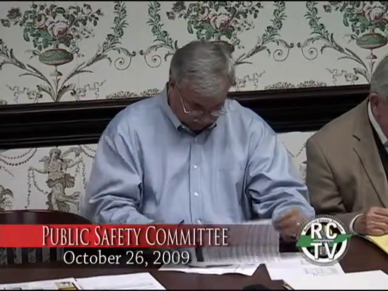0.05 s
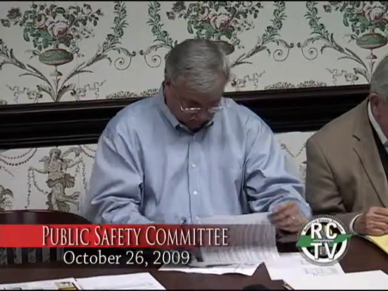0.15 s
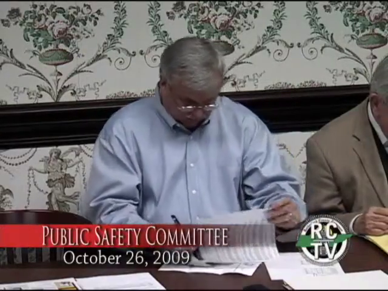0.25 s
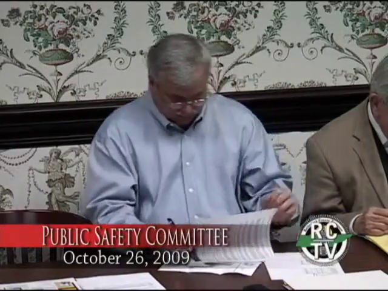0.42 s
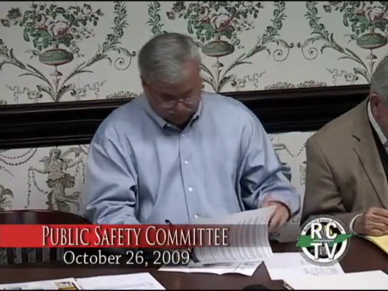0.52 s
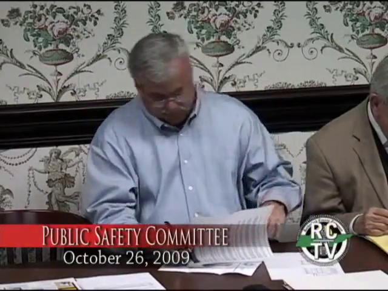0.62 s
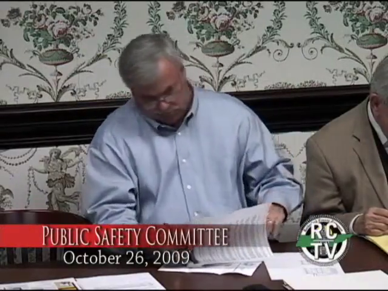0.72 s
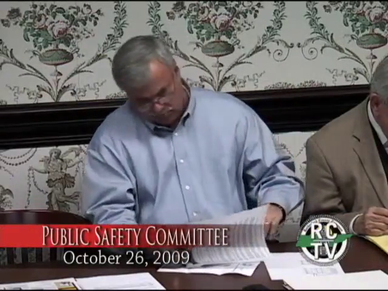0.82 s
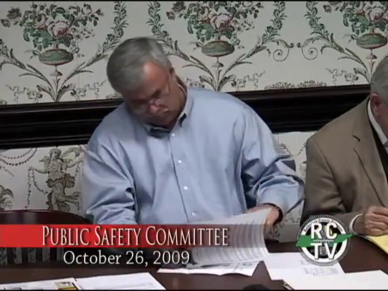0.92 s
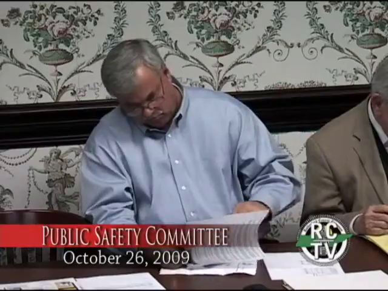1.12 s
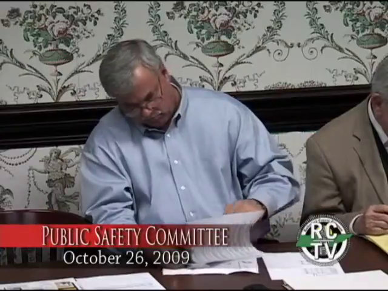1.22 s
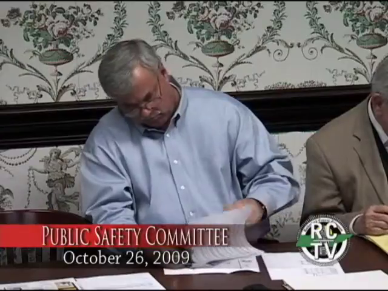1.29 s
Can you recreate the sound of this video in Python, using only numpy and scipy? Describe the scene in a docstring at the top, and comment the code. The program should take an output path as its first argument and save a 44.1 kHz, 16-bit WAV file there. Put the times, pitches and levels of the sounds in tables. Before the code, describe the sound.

Sheets of paper slide softly, then one page snaps taut with a sharp crack and short crinkling flap; a quiet pause follows, then fuller rustling. Small indoor room, fairly close microphone, low ventilation and electrical buzz.

```python
"""Paper on a meeting-room table

Sheets are leafed through: friction noise and fibre ticks slide, resonant bursts crinkle,
and one sheet snaps taut and flaps; low damped sines are pushes of hand and air on the table.
Shaped noise makes the ventilation's rumble and the room's answer; sines make the mains buzz in
the cable and a picture tube's whine. The recorder turns quiet passages down."""
import sys
import numpy as np
from scipy import signal
from scipy.fft import rfft, irfft, next_fast_len
from scipy.io import wavfile
from scipy.ndimage import uniform_filter1d, map_coordinates

SR = 44100
rng = np.random.default_rng(int(sys.argv[2]) if len(sys.argv) > 2 else 0)


def inscribe(sig):
    """Save sig as 16-bit PCM at rate SR to the path in sys.argv[1].

    A 1-D sig is mono; a 2-D sig holds one channel per row.
    Samples are clipped to [-1, 1] before scaling.
    """
    pcm = np.round(np.clip(np.atleast_2d(sig).T, -1, 1) * 32767)
    wavfile.write(sys.argv[1], SR, pcm.astype(np.int16))


def gain_from_decibels(decibels):
    """Convert decibel values to linear amplitude factors."""
    exponent = np.asarray(decibels, float) / 20
    return 10 ** exponent


N = 59535


def unit(x):
    """Scale to rms 1."""
    return x / np.sqrt(np.mean(x ** 2) + 1e-20)


def along(points, hz):
    """Read a curve of (frequency, value) points on a log frequency axis."""
    point_hz, value = np.transpose(points)
    return np.interp(np.log(hz + 1), np.log(point_hz + 1), value)


def wobble(rate):
    """A smooth random curve, rate knots a second."""
    return map_coordinates(rng.standard_normal(400), [np.arange(N) * rate / SR], mode="mirror")


def filtered(x, response):
    """Multiply the spectrum of x by a complex response of frequency."""
    size = next_fast_len(len(x) + 4096)
    return irfft(rfft(x, size) * response(np.fft.rfftfreq(size, 1 / SR)), size)[:len(x)]


def band(hz, width):
    """A causal resonance, width as a share of its pitch."""
    return lambda f: 1j * f * width * hz / (hz * hz - f * f + 1j * f * width * hz)


def rush(spectrum, patchy_db):
    """Noise of rms 1 whose gain varies in random patches of time and frequency."""
    cells = signal.stft(rng.standard_normal(N), nperseg=256)[2]
    patches = uniform_filter1d(rng.standard_normal(cells.shape), size=5, axis=0)
    patches = unit(uniform_filter1d(patches, size=6, axis=1))
    noise = signal.istft(cells * gain_from_decibels(patchy_db * patches), nperseg=256)[1][:N]
    return unit(filtered(noise, lambda hz: gain_from_decibels(along(spectrum, hz))))


def add(out, s, piece):
    """Mix a piece in at time s."""
    spot = out[max(round(s * SR), 0):][:len(piece)]
    spot += piece[:len(spot)]


def fibre_ticks():
    """Fibres catch and let go: tiny damped sines at random times, scaled together to rms 1."""
    ticks_per_s, middle_hz, decay_cycles, spread_db = 700, 2600, 3.4, 3
    place, pitch, chance = rng.random((3, int(ticks_per_s * N / SR), 1))
    hz = middle_hz * 4 ** (pitch - 0.5)  # an octave either way
    cycles = np.arange(128) / SR * hz
    sign = np.sign(place * N % 1 - 0.5)
    height = sign * gain_from_decibels(-spread_db * np.log(chance))
    ticks = height * np.sin(2 * np.pi * cycles) * np.exp(-3 * cycles / decay_cycles)
    at = (place * N).astype(int) + np.arange(128)
    return unit(np.bincount(at.ravel(), ticks.ravel(), N + 128)[:N])


# Sliding sheets: start_s, level_db, thin_share (power share of thin dry hiss, 0-1)
SLIDING = [(0, -53, 0.71), (.05, -56, 0.86), (.098, -57.5, 0.83), (.112, -52.5, 0.74), (.19, -51, 0.25),
           (.215, -53.5, 0.7), (.3, -52, 0.53), (.37, -54.5, 0.5), (.415, -66, 0.6), (0.439, -58.5, .99),
           (0.478, -56.5, 0.74), (.525, -68, 0), (.6, -77, 0), (.752, -77, .3), (0.761, -59, 0.14),
           (.79, -59, 0.37), (.805, -53, 0.28), (.845, -58.5, 0.07), (.88, -54, 0.25), (.96, -52, 0.25),
           (.995, -68, 0.76), (1.027, -51.5, 0.47), (1.06, -47, 0.56), (1.1, -44.5, 0.17),
           (1.13, -46, 0.36), (1.155, -45, 0.06), (1.21, -49, 0.18), (1.25, -53.5, 0.4), (1.265, -48, 0.08),
           (1.326, -47.5, 0.04), (1.35, -59, 0)]
# Sheet rubbing on sheet: frequency_hz, relative density_db (per Hz)
SHEET_ON_SHEET = [(150, -26), (500, -6), (1000, -10.5), (1900, 0.5), (3300, -3.5), (5000, -9),
                  (9000, -17.5), (15500, -25)]
# Sheet edge rubbing on the table: frequency_hz, relative density_db (per Hz)
EDGE_ON_TABLE = [(1000, -27), (3000, -13), (5000, -4), (7500, -3), (11000, -9), (15500, -20.5)]


def slide():
    """Friction noise and tiny fibre ticks follow one strength."""
    start_s, level_db, thin_share = np.transpose(SLIDING)
    t = np.arange(N) / SR
    level_db = np.interp(t, start_s, level_db)
    thin = np.clip(np.interp(t, start_s, thin_share), 0, 1)
    rub = np.sqrt(1 - thin) * rush(SHEET_ON_SHEET, patchy_db=2.5)
    rub += np.sqrt(thin) * rush(EDGE_ON_TABLE, patchy_db=2.5)
    ticks_db = -7  # against the rubbing
    return gain_from_decibels(level_db + 1.1 * wobble(59.7)) * (rub + gain_from_decibels(ticks_db) * fibre_ticks())


# Meeting room: frequency_hz, t60_s
ROOM_DECAY = [(100, 0.28), (1000, 0.3), (4000, 0.21), (12000, 0.29)]


def room(x):
    """Each frequency of the room's answer dies at its own speed."""
    hz, t, cells = signal.stft(rng.standard_normal(SR // 2), SR, nperseg=256)
    fade = gain_from_decibels(-60 * t / along(ROOM_DECAY, hz)[:, None])
    tail = signal.istft(cells * fade, SR, nperseg=256)[1]
    late = np.pad(x, (200, 0))  # the answer starts 200 samples behind the paper
    return signal.fftconvolve(late, tail / np.linalg.norm(tail))[:N]


# Ventilation rumble at the microphone: frequency_hz, relative density_db (per Hz)
VENTILATION = [(20, -11), (60, -5.5), (100, -1.5), (170, -3), (300, -11.5), (600, -13), (1200, -16.5),
               (3000, -26), (8000, -37), (15500, -51)]


def ventilation():
    """Moving air: patchy low noise whose level drifts smoothly."""
    level_db, swing_db = -59.5, -1
    return gain_from_decibels(level_db + swing_db * wobble(15.1)) * rush(VENTILATION, patchy_db=3.0)


# Mains buzz in the cable: frequency_hz, level_db (rms of a harmonic there, if odd)
CABLE_BUZZ = [(60, -74), (180, -66.5), (300, -70), (600, -76.5), (1200, -77.5), (2200, -78), (3500, -89.5),
              (6000, -94)]


def electrics():
    """Mains buzz with a sharp edge of changing sign each half cycle, tube whine, preamplifier hiss."""
    mains_hz, edge_s, even_db = 60.005, 0.0021, -22  # even harmonics are weaker by even_db
    whine_hz, whine_db, hiss_db = 15734.3, -67, -75  # levels are rms
    t = np.arange(N) / SR
    harmonic = np.arange(1, 101)[:, None]
    level_db = along(CABLE_BUZZ, harmonic * mains_hz) + even_db * (harmonic % 2 == 0)
    # all harmonics cross zero together at edge_s
    buzz = (gain_from_decibels(level_db) * np.sin(2 * np.pi * harmonic * mains_hz * (t - edge_s))).sum(axis=0)
    whine = gain_from_decibels(whine_db) * np.sin(2 * np.pi * whine_hz * t)
    hiss = gain_from_decibels(hiss_db) * rng.standard_normal(N)
    return np.sqrt(2) * (buzz + whine) + hiss


# Creases that snap: start_s, level_db (peak of the ringing), pitch_hz, t60_s (of the rattle)
CREASES = [(.109, -43.5, 577, 0.075), (.2175, -12.5, 986, 0.015), (.2176, -21.5, 385, 0.022),
           (.218, -21.5, 4500, 0.0034), (0.219, -13.5, 1600, 0.0037), (0.2198, -10, 2070, 0.0072),
           (0.222, -39, 1710, 0.057), (0.255, -19.5, 4870, 0.0093), (.256, -17.5, 1550, 0.04),
           (0.2754, -25, 1420, 0.011), (0.2868, -26.5, 640, .012), (0.302, -28, 1460, 0.035),
           (.344, -38, 580, 0.014), (.585, -45.5, 720, 0.09), (.7595, -44, 1780, 0.053),
           (.78, -38, 5400, 0.012), (0.8, -35.5, 2600, 0.027), (.818, -44, 2130, 0.0079),
           (1.1523, -30, 4930, 0.0078), (1.229, -31.5, 730, 0.032), (1.229, -34.5, 2200, 0.0066),
           (1.258, -38.5, 1180, 0.036), (1.268, -38, 2010, 0.017), (1.321, -33, 2440, 0.017)]


def snaps():
    """Each crease gives a blow into a wide resonance of the sheet, a dying rattle and a broad crack."""
    blow = 11  # first sample, against a rattle of rms 1
    crack_db, crack_t60_s = -19, 0.0022  # level against the ringing's peak
    out, t = np.zeros(N), np.arange(4096) / SR
    for start_s, level_db, pitch_hz, t60_s in CREASES:
        rattle, crack = rng.standard_normal((2, len(t)))
        rattle[0] = -blow
        ring = filtered(rattle * gain_from_decibels(-60 * t / t60_s), band(pitch_hz, 0.62))
        ring = filtered(ring, band(pitch_hz, 1.43))
        ring /= np.abs(ring).max()
        crack *= gain_from_decibels(crack_db - 60 * t / crack_t60_s)
        add(out, start_s, gain_from_decibels(level_db) * (ring + crack))
    return out


# Soft pushes of hand and air on the table: start_s, level_db (amplitude at the start), pitch_hz
PUSHES = [(.11, -45.5, 200), (0.2195, -25, 105), (0.252, -42, 70.4), (.27, -31, 198), (.3, -35, 224),
          (1.149, -42.5, 190), (1.2, -48, 170), (1.229, -34.5, 251), (.29, -37, 79), (0.358, -42, 59.4),
          (0.381, -45, 160), (0.554, -42.5, 150), (0.586, -46, 59.5), (.722, -41, 149), (0.789, -50, 142),
          (0.853, -43, 148), (1.052, -42.5, 102), (1.079, -44, 101), (1.118, -44, 170), (1.17, -45, 90.5),
          (1.26, -46.5, 60), (1.31, -44, 60)]


def thumps():
    """Low damped sines, each losing 30 dB in about two cycles."""
    decay_cycles = 2.03
    out, t = np.zeros(N), np.arange(8192) / SR
    for start_s, level_db, pitch_hz in PUSHES:
        fade = gain_from_decibels(level_db - 30 * t * pitch_hz / decay_cycles)
        add(out, start_s, -fade * np.sin(2 * np.pi * pitch_hz * t))
    return out


# Short scuffs: middle_s, length_s, level_db (rms before the swell shapes it), pitch_hz
SHORT_SCUFFS = [(0.234, 0.025, -43, 1190), (0.249, .02, -32, 680), (.258, .025, -36.5, 1780),
                (.278, .016, -34.5, 1490), (0.295, .05, -40.5, 560), (0.305, .018, -40, 1590),
                (0.247, 0.018, -42.5, 3570), (0.324, .014, -43.5, 5460), (0.334, .02, -45.5, 2820),
                (0.352, 0.012, -40, 5870), (.359, 0.018, -37.5, 2130), (0.38, .014, -48, 460),
                (.59, .035, -58.5, 634), (.868, .04, -55, 900), (1.047, 0.042, -49.5, 5400),
                (1.07, 0.045, -43, 3480), (1.106, 0.065, -44.5, 2600), (1.152, 0.055, -43.5, 3080),
                (1.307, 0.028, -50, 1900)]


def scuffs():
    """Brief friction around one pitch: twice-resonated noise that swells and fades."""
    out = np.zeros(N)
    for middle_s, length_s, level_db, pitch_hz in SHORT_SCUFFS:
        resonance = band(pitch_hz, 0.74)
        rub = unit(filtered(rng.standard_normal(4096), lambda f: resonance(f) ** 2))
        progress = np.clip(np.arange(4096) / SR / length_s, 0, 1)
        swell = np.sin(np.pi * progress) ** 2
        add(out, middle_s - length_s / 2, gain_from_decibels(level_db) * rub * swell)
    return out


def scene():
    """Paper in the room over ventilation and electrics."""
    paper = slide() + snaps() + thumps() + scuffs()
    room_db = -10.5
    return (paper + gain_from_decibels(room_db) * room(paper) + ventilation() + electrics())[None]


# Microphone response: frequency_hz, gain_db
MICROPHONE = [(25, -10), (55, -0.5), (9000, -0.5), (12000, 0), (14000, -4.5), (15500, -8), (16200, -35)]


def microphone(x):
    """The deepest bass and the top treble roll off."""
    return filtered(x, lambda hz: gain_from_decibels(along(MICROPHONE, hz)))


def expander(x):
    """The recorder turns down what stays under a threshold, further the quieter it is."""
    threshold_db, slope, most_db = -52.5, 0.6, -6  # slope in dB per dB under the threshold
    follow_s = 0.13  # averaging window, centred
    power = np.abs(uniform_filter1d(x ** 2, int(follow_s * SR)))
    level_db = 10 * np.log10(power + 1e-12)
    return x * gain_from_decibels(np.clip(slope * (level_db - threshold_db), most_db, 0))


def band_limit(x):
    """A steep low-pass at the top of the band."""
    return signal.sosfilt(signal.butter(12, 16410, fs=SR, output="sos"), x)


def record(dry):
    """The microphone's response, then the recorder's expander."""
    mix = expander(microphone(dry[0]))[None]
    return band_limit(mix)


dry = scene()
out = record(dry)
inscribe(out)
```